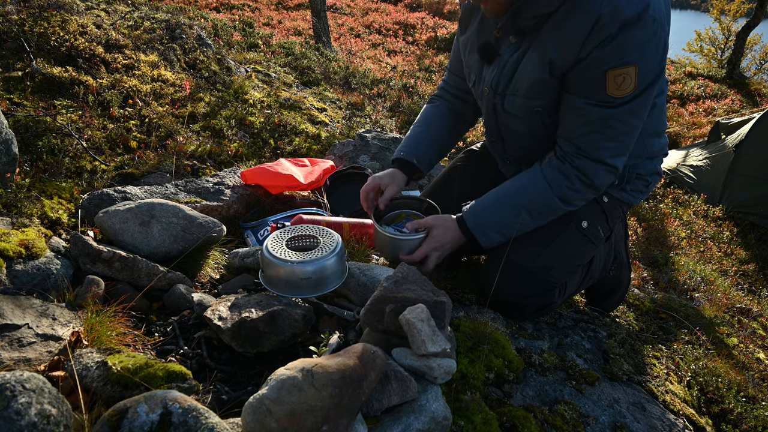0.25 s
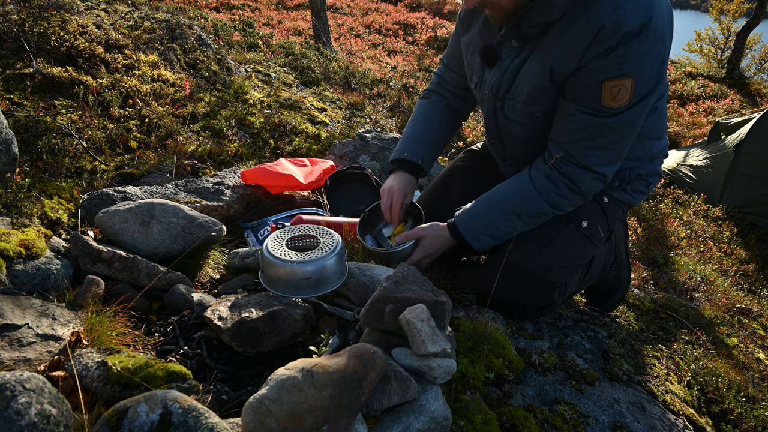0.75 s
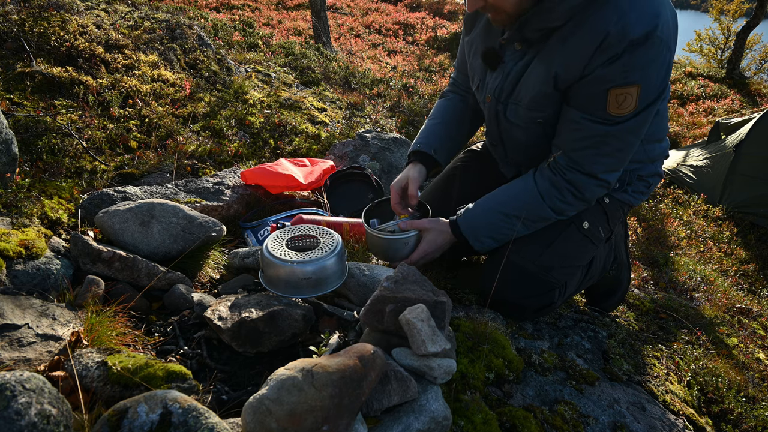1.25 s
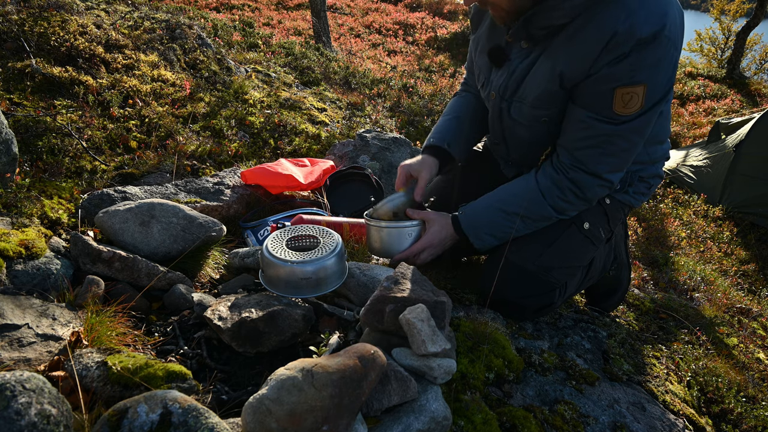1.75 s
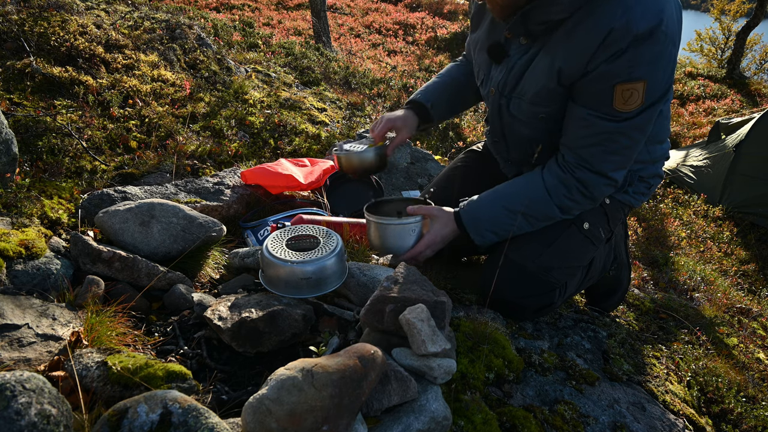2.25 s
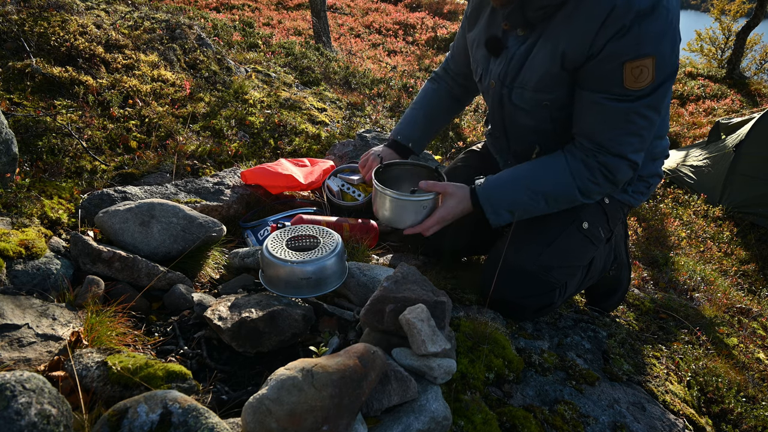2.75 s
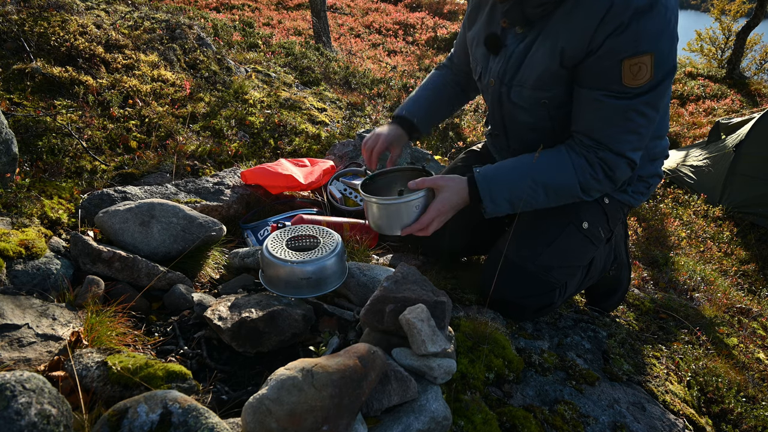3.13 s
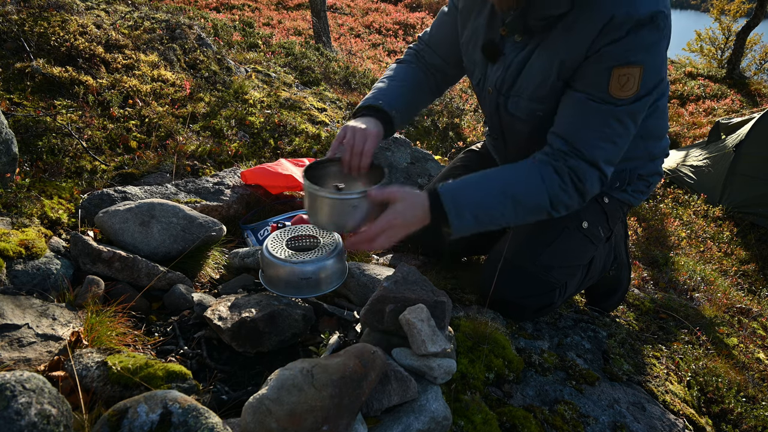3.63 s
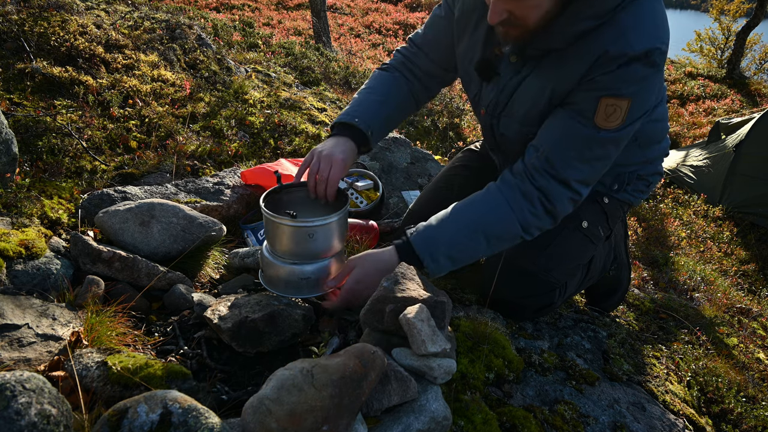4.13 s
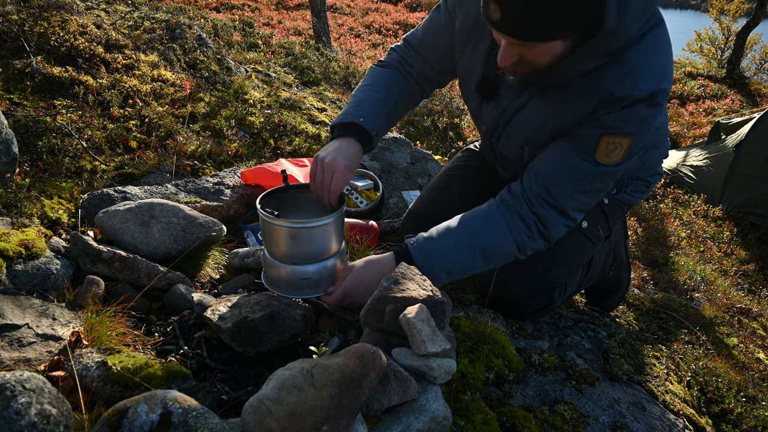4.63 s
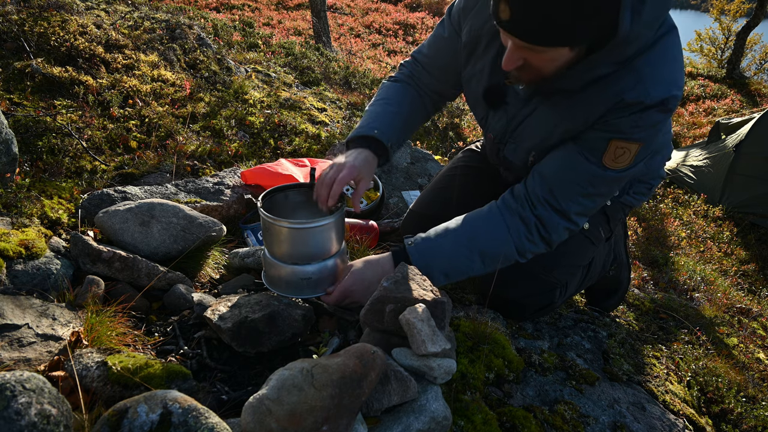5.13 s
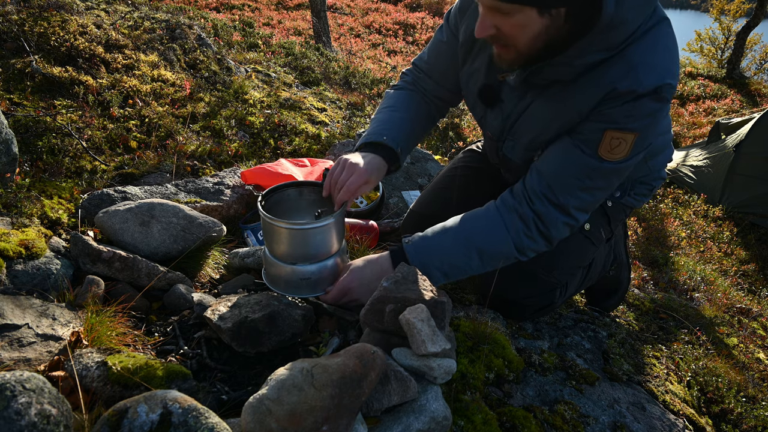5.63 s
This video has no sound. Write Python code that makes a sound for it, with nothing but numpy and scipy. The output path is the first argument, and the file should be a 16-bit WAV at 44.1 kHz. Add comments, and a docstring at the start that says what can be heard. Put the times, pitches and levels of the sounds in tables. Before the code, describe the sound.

Close and dry, nearly mono: irregular metal knocks and rubs in a hollow little pot, muffled by the hand, thin out, then a bright double clang as the burner lands in a pan that briefly rings. Almost silence follows, with faint squeaks and ticks. Then pot meets stove rim with a light ringing clink, grating and knocking into place. Soft cloth rustle, faint open-air noise, no reverberation.

```python
"""Camping stove assembled on a heath

Someone kneeling fumbles a burner out of a hand-held aluminium pot and drops it into a pan, then sets
the pot on the stove's windshield and twists it into its seat. Knocks and scrapes are noise bursts and
random slips exciting decaying modes; squeaks are unsteady sines. A jacket rustles as filtered grains,
over very still open air: faint coloured noise, no echo.
"""
import sys
import numpy as np
from scipy import signal
from scipy.fft import rfft, irfft, next_fast_len
from scipy.io import wavfile

SR = 44100
rng = np.random.default_rng(int(sys.argv[2]) if len(sys.argv) > 2 else 0)


def persist_wave(psi):
    """Save psi, clipped to +-1, as 16-bit WAV."""
    counts = np.round(np.clip(psi, -1, 1) * 32767).astype(np.int16)
    wavfile.write(sys.argv[1], SR, np.atleast_2d(counts).T)


N = 259308

# Clear modes of pot, pan and windshield.
# Each row: frequency in Hz, mean level in dB, t60 in seconds before any grip.
POT_MODES = [(348, -8.5, 0.051), (572, -2, 0.021), (657, -6.5, 0.019), (719, -3.5, 0.026),
             (765, -11, 0.068), (1580, -4, 0.039), (2105, -5.5, 0.032), (2540, -1, 0.0099),
             (2890, -9, 0.009), (3540, -9.5, 0.067), (4550, -7, 0.023), (5610, -8, 0.1), (7400, -29, .04),
             (10500, -14, 0.071)]
PAN_MODES = [(350, -12, .2), (715, -8, .08), (926, -5, .22), (1105, -7, .3), (1136, 2, .45),
             (1723, -11, .12), (1884, -5, .28), (1925, -7, .25), (2640, -4, .3), (2830, -10, .2),
             (3080, -11, .2), (3402, -7, .26), (3795, -10, .25), (4238, -6, .25), (4620, -14, .22),
             (5180, -11, .18), (5590, -15, .2), (6232, -8, .14), (6670, -15, .2), (7583, -13, .16)]
STOVE_MODES = [(715, -6, .06), (905, -4, .28), (985, -4, .28), (1040, -3, .33), (1110, -8, .25),
               (2143, -11, .16), (2610, -11, .16), (2797, -6, .27), (3564, -10, .14), (3844, -11, .15),
               (4140, -9, .13), (4522, -11, .13), (5700, -14, .15), (6170, -13, .15), (6815, -14, .16)]
# Crowd of overlapping modes in thin sheet. Each row: frequency in Hz, gain in dB.
SHEET_CROWD = [(60, -31), (180, -12), (300, -6), (480, -4.5), (720, 3.5), (1000, -3), (1300, -1.5),
               (1800, 1), (3000, 0), (4200, -5), (6500, -4), (10800, -8.5), (13000, -17), (16000, -22.5)]
# Hollow of the pot with the burner inside. Each row: frequency in Hz, gain in dB.
POT_HOLLOW = [(200, -5), (450, -6), (590, 3), (730, 5), (880, -7), (1200, -3), (1600, 0), (2100, 3),
              (2900, -1), (5000, 0)]

TOP_HZ = 15900
RING_S = np.arange(SR // 2) / SR  # time axis of one blow
CHOKE_S = .012  # time constant once the metal is held
THUD_HZ, BODY_HZ, SOFT_HZ, CLANK_HZ = 50, 270, 690, 3120  # hardness tells above SOFT_HZ
STROKE_RISE_SHARE = .43  # part of a stroke's length given to its rise
BRISK_S, HISS_DB_PER_HALVING = 0.053, 0.5  # strokes shorter than BRISK_S hiss more
SQUEAK_SAG_PER_S = 0.36  # fraction of the starting pitch lost per second


def undb(db):
    """Decibels to gain."""
    return 10 ** (np.asarray(db) / 20)


def unit(x):
    """Scale to rms 1."""
    return x / np.sqrt(np.mean(x ** 2))


def band(x, lo_hz, hi_hz):
    """Causal band-pass."""
    return signal.sosfilt(signal.butter(3, [lo_hz, hi_hz], "band", fs=SR, output="sos"), x)


def colour(x, points):
    """Filter through (Hz, dB) points, minimum phase so that attacks stay sharp."""
    hz, db = np.transpose(points)
    n = 2 * next_fast_len(len(x))
    grid_hz = np.maximum(np.fft.rfftfreq(n, 1 / SR), 1)
    gain_db = np.interp(np.log(grid_hz), np.log(hz), db)
    cepstrum = irfft(np.log(undb(gain_db)))
    # fold the cepstrum to its causal half
    cepstrum[1:n // 2] *= 2
    cepstrum[n // 2 + 1:] = 0
    response = np.exp(rfft(cepstrum))
    return irfft(rfft(x, n) * response)[:len(x)]


def fade(t60):
    """Exponential decay, 60 dB in t60 seconds."""
    return np.exp(-np.log(1000) * RING_S / t60)


def add(out, s, x):
    """Mix x into out from time s in seconds."""
    i = max(int(s * SR), 0)
    out[i:i + len(x)] += x[:N - i]


def grains(rate, spread_db):
    """Random tiny slips, rate per second, of uneven size and either sign."""
    hits = rng.random(N) < rate / SR
    signs = rng.choice([-1, 1], N)
    return hits * signs * undb(spread_db * np.minimum(rng.exponential(size=N), 4))


def wander(n, rate):
    """Random values of spread near 1, rate per second, joined by straight lines."""
    position = np.arange(n) * rate / SR
    return 1.2 * np.interp(position, np.arange(4096), rng.standard_normal(4096))


def clear_ring(modes, strength_db, grip_t60):
    """Clear modes, varied as by the striking spot and shortened by whatever touches the metal."""
    ring = 0
    for hz, db, t60 in modes:
        strength, side = rng.standard_normal(2)
        mode = unit(np.sin(2 * np.pi * hz * RING_S) * fade(t60))
        ring = ring + np.sign(side) * undb(db + strength_db * strength) * mode
    return unit(ring * fade(grip_t60))


def vessel(modes, crack_t60, tail_t60, tail_db, modes_db):
    """One blow on thin metal: a crack, a duller wash of crowded modes, and the clear modes."""
    crack, wash = rng.standard_normal((2, len(RING_S)))
    tail = undb(tail_db) * band(wash, 224, 6700) * fade(tail_t60)
    crowd = unit(colour(crack * fade(crack_t60) + tail, SHEET_CROWD))
    return crowd + undb(modes_db) * clear_ring(modes, strength_db=3.0, grip_t60=0.15)


def chatter(x, span_s, bounce_db):
    """Loose metal meets four more times at random within span_s."""
    out = x.copy()
    for when, size in rng.random((4, 2)):
        late = np.pad(x, (int(when * span_s * SR), 0))[:len(x)]
        out += undb(bounce_db) * (2 * size - 1) * late
    return out


def knocks(table, blow, span_s, bounce_db, thud_db, body_db, clank_db, top_db):
    """Contacts rattle the vessel; the harder each is, the more it tilts towards the treble."""
    out = np.zeros(N)
    onset = int(.015 * SR)  # level is set over these samples
    hz = np.array([THUD_HZ, BODY_HZ, SOFT_HZ, CLANK_HZ, TOP_HZ])
    voice_db = np.array([thud_db, body_db, 0, clank_db, top_db])
    octaves = np.log2(np.maximum(hz / SOFT_HZ, 1))
    for s, db, hardness in table:
        rattle = chatter(blow(), span_s, bounce_db)
        x = colour(rattle, np.column_stack([hz, voice_db + hardness * octaves]))
        add(out, s, undb(db) * x / np.std(x[:onset]))
    return out


def rub(strokes, modes, rate, spread_db, judder_db, modes_db, hiss_db):
    """Metal slides on metal: strokes swell and die; juddering slips rasp and stir the modes."""
    out = np.zeros(N)
    for s, length_s, db in strokes:
        rise_s, fall_s = STROKE_RISE_SHARE * length_s, (1 - STROKE_RISE_SHARE) * length_s
        t = np.arange(-3 * rise_s, 3 * fall_s, 1 / SR)
        swell = np.exp(-.5 * (t / np.where(t < 0, rise_s, fall_s)) ** 2)
        judder = undb(judder_db * wander(len(t), rate=120))
        slips = grains(rate, spread_db)[:len(t)] * judder
        # noise follows the slips' decaying power
        power = np.abs(signal.fftconvolve(slips ** 2, fade(0.018) ** 2)[:len(t)])
        rasp = colour(rng.standard_normal(len(t)) * np.sqrt(power), SHEET_CROWD)
        struck = clear_ring(modes, strength_db=3.0, grip_t60=0.14)
        ring = signal.fftconvolve(slips, struck)[:len(t)]
        x = unit(rasp) + undb(modes_db) * unit(ring)
        hiss = undb(hiss_db + HISS_DB_PER_HALVING * np.log2(BRISK_S / length_s))
        sound = unit(band(x, 324, 4440)) + hiss * unit(band(x, 3870, SR / 2 - 1))
        add(out, s + t[0], undb(db) * swell * sound)
    return out


def free_rings(table, modes, crowd_db, crowd_t60):
    """A vessel rings on, clear modes over a crowd of weak ones, until it is held and choked."""
    out = np.zeros(N)
    onset = int(.03 * SR)  # level is set over these samples
    for s, held_s, db, lowest_hz in table:
        crowd = colour(rng.standard_normal(len(RING_S)), SHEET_CROWD) * fade(crowd_t60)
        ring = clear_ring(modes, strength_db=.5, grip_t60=3)
        x = band(ring + undb(crowd_db) * unit(crowd), lowest_hz, 7000)
        x *= np.exp(-np.maximum(RING_S - (held_s - s), 0) / CHOKE_S)
        add(out, s, undb(db) * x / np.std(x[:onset]))
    return out


def still_air():
    """Faint steady noise of the open air."""
    # Spectrum. Each row: frequency in Hz, gain in dB.
    air_points = [(15, -21), (25, -25), (48, -9), (161, 1), (863, 4), (1290, 0), (2220, -5), (8830, -10.5),
                  (16000, -19)]
    return undb(-75) * unit(colour(rng.standard_normal(N), air_points))


def jacket(rate, spread_db, gain_db):
    """Padded cloth folds softly as the arms move: coloured grains under a level curve."""
    # Rustle level. Each row: time in seconds, level in dB before gain_db.
    rustle_points = [(0.0, -69.5), (0.24, -82.5), (0.51, -88), (0.67, -66.5), (0.98, -80.5), (1.49, -78.5),
                     (1.88, -73.5), (2.31, -87.5), (2.57, -87), (2.73, -78), (2.88, -82.5), (4.57, -74),
                     (4.73, -70.5), (5.88, -78.5)]
    # Colour of the padded cloth. Each row: frequency in Hz, gain in dB.
    cloth_points = [(25, -17), (60, -22), (120, -5), (200, 0), (300, 3.5), (450, 2), (800, -8), (2000, -9),
                    (9000, -24), (16000, -34)]
    s, db = np.transpose(rustle_points)
    level_db = np.interp(np.arange(N) / SR, s, db) + gain_db
    return unit(colour(grains(rate, spread_db), cloth_points)) * undb(level_db)


def pot_blow():
    """One blow on the pot, choked by the hand that holds it and coloured by its hollow."""
    blow = vessel(POT_MODES, crack_t60=0.015, tail_t60=0.061, tail_db=-9, modes_db=-4.0)
    return colour(blow, POT_HOLLOW)


def pot():
    """The burner knocks and rubs inside the hand-held pot; a last dull knock as it is set down."""
    # Contacts. Each row: start in seconds, level in dB, hardness in dB per octave
    # (below 0 a dull bump with the flat, above 0 a sharp tick with an edge).
    contact_rows = [(.0339, -48.5, 10.5), (.0795, -53, 2), (.1123, -36, 4.5), (.1155, -43, 2),
                    (.1665, -44, 4.5), (.1698, -44.5, 4), (.2362, -41.5, -3.5), (.4549, -45.5, -5),
                    (.4752, -56, 0.5), (.51, -55.5, 4.5), (.5475, -41.5, -6.5), (.5655, -45, -6),
                    (.5804, -46.5, -8.5), (.5947, -37.5, -13.5), (.6268, -39.5, -1.5), (.6698, -44.5, -1),
                    (.7354, -48, 0), (.8177, -41, -1), (.8475, -35.5, 2.5), (.9888, -49, -3.5),
                    (1.071, -34, -8), (1.0811, -38.5, -3), (1.2273, -41.5, -2.5), (1.263, -50.5, -5),
                    (1.282, -49, 2.5), (1.4508, -44.5, -8.5), (1.5533, -45.5, -2.5), (1.6368, -48.5, 1.5),
                    (1.6755, -42, 2), (1.6981, -38.5, -1), (1.7042, -38.5, -2), (1.7545, -49, -2.5),
                    (1.8575, -53, 0), (1.9314, -58, -1.5), (2.0807, -63, 5), (2.152, -67.5, -1.5),
                    (3.0179, -56.5, -6)]
    # Strokes. Each row: peak time in seconds, rise plus fall in seconds, level in dB before the hollow.
    stroke_rows = [(.04, 0.016, -48.5), (.08, 0.024, -57.5), (.147, .05, -57.5), (.36, 0.24, -71.5),
                   (.585, 0.089, -53), (.752, 0.056, -48), (.858, .07, -53), (1.01, .12, -63),
                   (1.097, 0.05, -57.5), (1.28, 0.24, -62), (1.5, .14, -60.5), (1.688, 0.053, -45.5),
                   (1.83, 0.099, -57), (2.03, 0.21, -72)]
    struck = knocks(contact_rows, pot_blow, span_s=.004, bounce_db=-1.5,
                    thud_db=-18, body_db=0.5, clank_db=2.0, top_db=1.0)
    rubbed = rub(stroke_rows, POT_MODES, rate=2000, spread_db=3.5, judder_db=4.0,
                 modes_db=-6.5, hiss_db=-2.5)
    return struck + colour(rubbed, POT_HOLLOW)


def squeaks():
    """A sliding rim sticks and slips at an unsteady, slowly sinking pitch."""
    # Squeaks. Each row: start in seconds, length in seconds, starting pitch in Hz, level in dB.
    squeak_rows = [(0.122, 0.025, 5670, -43.5), (3.067, 0.094, 1950, -75), (3.097, 0.088, 2780, -79),
                   (3.192, 0.094, 3100, -80), (3.21, 0.092, 2400, -78)]
    out = np.zeros(N)
    for s, length_s, hz, db in squeak_rows:
        n = int(length_s * SR)
        sag = SQUEAK_SAG_PER_S * np.arange(n) / SR
        pitch_hz = hz * (1 - sag + 0.021 * wander(n, rate=470))
        tone = np.sin(2 * np.pi * np.cumsum(pitch_hz) / SR)
        add(out, s, undb(db) * unit(tone * signal.windows.tukey(n, .7)))
    return out


def pan_blow():
    """One blow on the pan lying on the ground."""
    return vessel(PAN_MODES, crack_t60=0.037, tail_t60=0.17, tail_db=-17.5, modes_db=-7.0)


def pan():
    """The burner drops into the pan, which is struck, rings and is scraped."""
    # Contacts. Each row: start in seconds, level in dB, hardness in dB per octave.
    contact_rows = [(2.6093, -30.5, 0), (2.6122, -39.5, -3), (2.6313, -31.5, -3), (2.6395, -32, -8),
                    (2.661, -36.5, -2.5), (2.7253, -33.5, -1), (2.7323, -38.5, -6.5), (2.8525, -52.5, 1.5),
                    (2.8747, -57, -10.5), (2.971, -68.5, -3.5)]
    # Free rings. Each row: start in seconds, time held in seconds, level in dB, lowest free Hz.
    ring_rows = [(2.61, 2.722, -35.5, 230), (2.727, 2.92, -45, 1800)]
    # Strokes. Each row: peak time in seconds, rise plus fall in seconds, level in dB.
    stroke_rows = [(2.583, 0.076, -61.5), (2.702, 0.038, -43.5), (2.757, 0.024, -47.5), (2.825, 0.081, -63),
                   (3.18, 0.17, -70.5)]
    out = knocks(contact_rows, pan_blow, span_s=0.0024, bounce_db=-7.5,
                 thud_db=-11, body_db=2, clank_db=5.5, top_db=-4.5)
    out += free_rings(ring_rows, PAN_MODES, crowd_db=-6, crowd_t60=.28)
    out += rub(stroke_rows, PAN_MODES, rate=9700, spread_db=2.0, judder_db=5.5,
               modes_db=-15, hiss_db=-18)
    return out


def stove_blow():
    """One blow on the windshield with the pot resting in it."""
    return vessel(STOVE_MODES, crack_t60=0.025, tail_t60=0.16, tail_db=-14.5, modes_db=-8.5)


def stove():
    """The pot knocks on the windshield, which rings, and scrapes as it is twisted into its seat."""
    # Contacts. Each row: start in seconds, level in dB, hardness in dB per octave.
    contact_rows = [(3.4015, -64, -8.5), (3.4812, -58, -0.5), (3.5128, -60.5, 2), (3.9812, -45, -.5),
                    (3.996, -41.5, -0.5), (4.0591, -50.5, -5), (4.2355, -45, -3.5), (4.3799, -48.5, -4),
                    (4.4718, -43, -3.5), (4.4809, -46, 0), (4.5364, -56.5, 1), (4.732, -44, -3),
                    (4.8425, -55, 0.5), (4.9635, -47, -2.5), (5.1846, -49.5, -4.5), (5.2337, -54.5, 0.5),
                    (5.3473, -47, -6.5), (5.3733, -52.5, -.5), (5.4237, -51, -1.5), (5.4916, -52.5, 1.5),
                    (5.5518, -36, -2), (5.7106, -49, 1.5), (5.7571, -58, -3), (5.7922, -55.5, -7)]
    # Free rings. Each row: start in seconds, time held in seconds, level in dB, lowest free Hz.
    ring_rows = [(3.996, 4.23, -44, 229), (5.556, 5.71, -50.5, 704)]
    # Strokes. Each row: peak time in seconds, rise plus fall in seconds, level in dB.
    stroke_rows = [(3.434, 0.028, -68.5), (3.608, 0.059, -68.5), (4.04, 0.08, -63), (4.29, 0.11, -63.5),
                   (4.374, 0.019, -56), (4.51, 0.049, -59.5), (4.725, 0.046, -53.5), (4.86, .065, -63),
                   (4.98, 0.14, -57), (5.192, 0.016, -55.5), (5.258, .038, -65), (5.386, 0.057, -57),
                   (5.535, 0.059, -54), (5.556, 0.028, -42.5), (5.615, 0.063, -58), (5.77, 0.09, -70)]
    out = knocks(contact_rows, stove_blow, span_s=0.0056, bounce_db=-0.5,
                 thud_db=-2, body_db=4.0, clank_db=-1.0, top_db=4.0)
    out += free_rings(ring_rows, STOVE_MODES, crowd_db=-7, crowd_t60=.2)
    out += rub(stroke_rows, STOVE_MODES, rate=1300, spread_db=0.5, judder_db=1.5,
               modes_db=-8, hiss_db=-3.0)
    return out


def scene():
    """All sources straight ahead, nearly mono; a weak noise-filtered copy, mostly treble, parts left from right."""
    mid = still_air() + jacket(rate=360, spread_db=3.0, gain_db=5.5)
    mid += pot() + squeaks() + pan() + stove()
    noise_filter = rng.standard_normal(256) / np.sqrt(256)
    side_points = [(100, -51.0), (1200, -60), (2500, -42), (5000, -25.5), (9000, -15.5), (14000, -15.5)]
    side = colour(signal.fftconvolve(mid, noise_filter)[:N], side_points)
    return np.array([mid + side, mid - side])


def record(dry):
    """The recorder cuts steeply above TOP_HZ."""
    return signal.sosfilt(signal.ellip(10, .2, 70, TOP_HZ, fs=SR, output="sos"), dry)


dry = scene()
out = record(dry)
persist_wave(out)
```